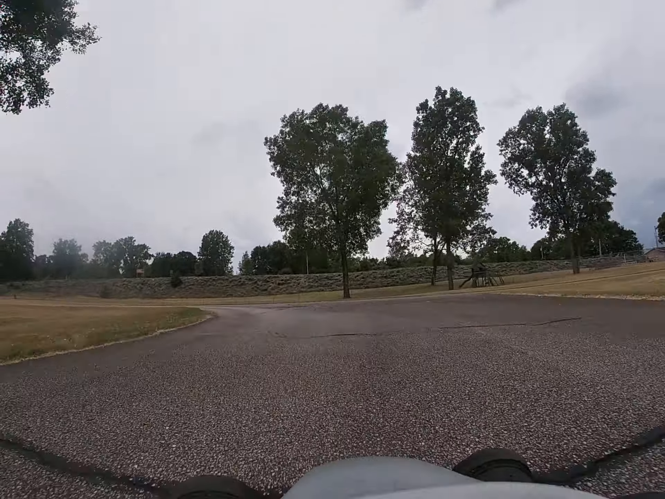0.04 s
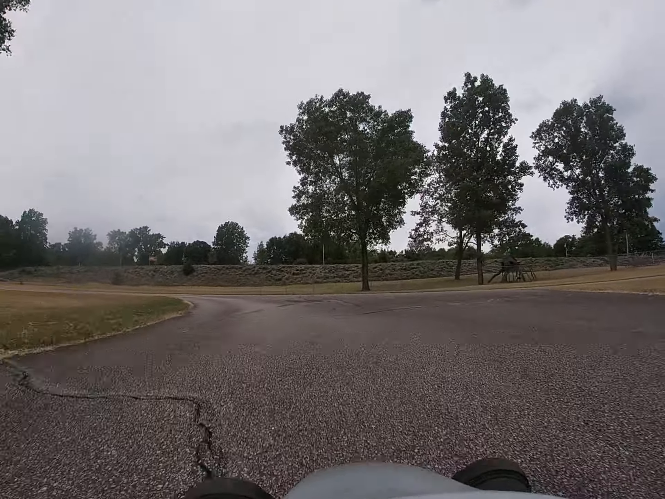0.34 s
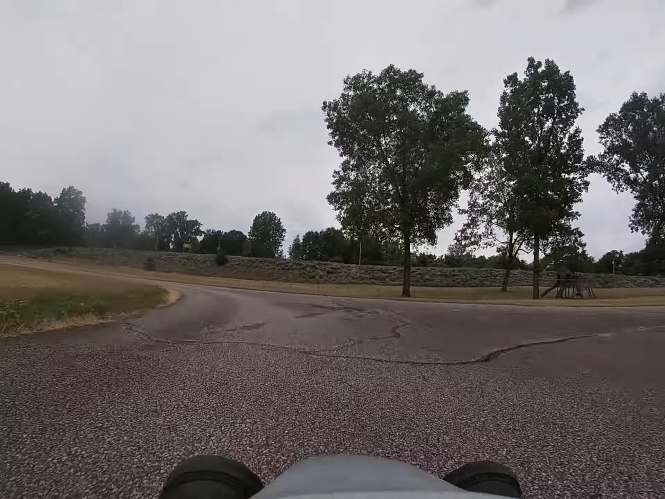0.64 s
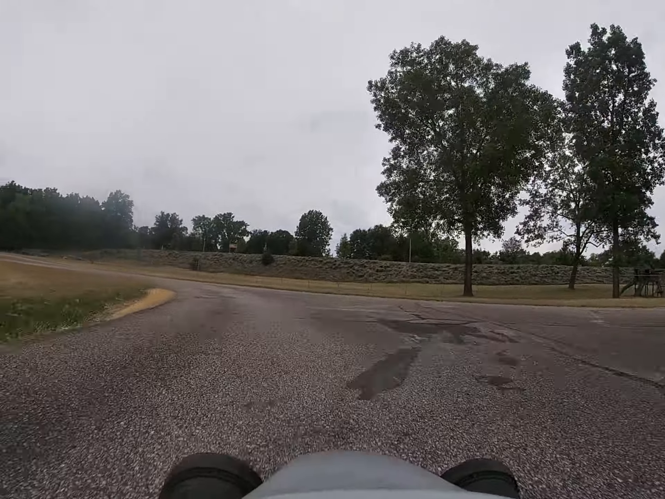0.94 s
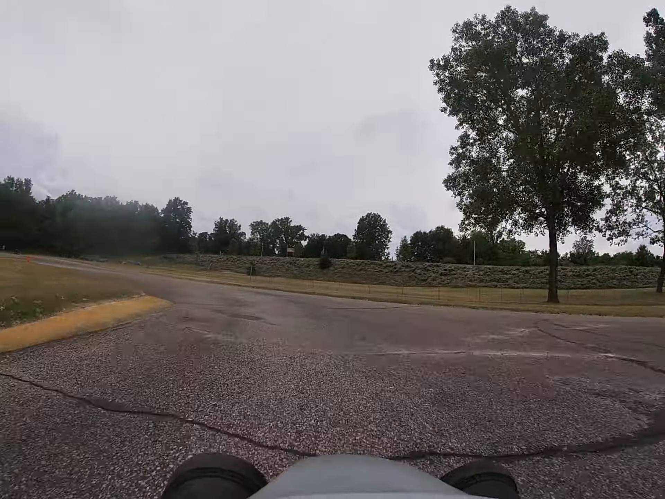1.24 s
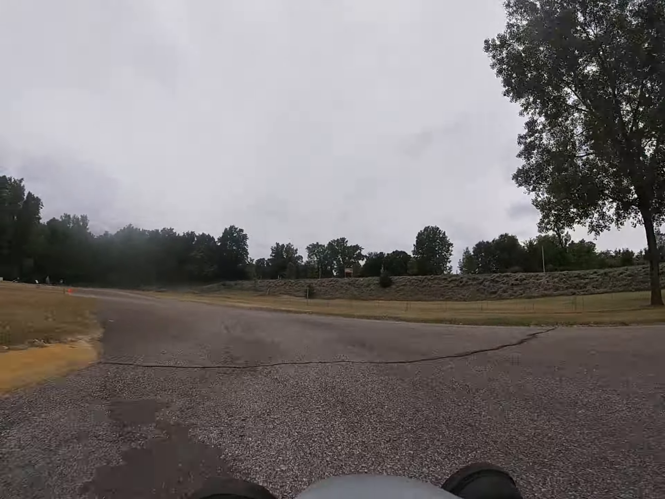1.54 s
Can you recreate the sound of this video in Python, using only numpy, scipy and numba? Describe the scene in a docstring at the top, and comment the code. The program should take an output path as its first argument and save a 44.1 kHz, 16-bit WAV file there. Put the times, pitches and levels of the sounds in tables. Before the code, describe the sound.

A single-cylinder go-kart engine thumps rapidly, heard from on board on an outdoor asphalt track. Tyres roar beneath it, loose metal clatters and buzzes, and wind buffets the microphone. Bits of grit tick against the bodywork in the first half. The engine dips briefly at the start, climbs slightly in pitch, then softens and dulls near the end as the tyres scrub harder through a corner.

```python
"""The rapid thumping of a single-cylinder four-stroke go-kart, heard on board as it laps worn asphalt.
Each firing is a pressure impulse that rings the exhaust pipe and muffler; in the same cycle the airbox
gulps, the valve gear clatters and a metal guard buzzes. Beneath the engine the tyres roar and scrub
through a corner, the chain sizzles, grit ticks on the bodywork and wind buffets the microphone."""
import sys
import numpy as np
from scipy import signal
from scipy.fft import rfft, irfft
from scipy.io import wavfile
from numba import njit

SR = 44100
rng = np.random.default_rng(int(sys.argv[2]) if len(sys.argv) > 2 else 0)


def transcribe(signal):
    """Save signal, clipped to [-1, 1], as a 16-bit WAV file at the path in sys.argv[1]."""
    frames = np.atleast_2d(signal).T
    limited = np.clip(frames, -1, 1)
    pcm = np.round(limited * 32767).astype(np.int16)
    wavfile.write(sys.argv[1], SR, pcm)


N = 255329
TIME = np.arange(N) / SR
FREQ = np.maximum(np.arange(N + 1) * SR / (2 * N), 1)


def undb(db):
    """Amplitude ratio of a level in decibels."""
    return 10 ** (np.asarray(db) / 20)


def unit(x):
    """Normalisation to an rms of one."""
    return x / np.sqrt(np.mean(x ** 2))


def curves(table):
    """Linear interpolation of each column in time."""
    times, *columns = np.transpose(table)
    return [np.interp(TIME, times, column) for column in columns]


def swells(table):
    """Sum of raised cosines, one for each (middle, length, height) row."""
    return sum(height * np.cos(np.pi * np.clip((TIME - middle) / length, -.5, .5)) ** 2
               for middle, length, height in table)


def through(x, response):
    """Linear filtering: the spectrum times a frequency response."""
    return irfft(rfft(x, 2 * N) * response)[:N]


def resonance(hz, width_hz):
    """Response of one damped mode."""
    return 1 / (1 + 1j * (FREQ / hz - hz / FREQ) * hz / width_hz)


def below(hz, order):
    """Zero-phase low-pass response."""
    return 1 / (1 + (FREQ / hz) ** order)


def colour(points):
    """Spectral envelope through (f/Hz, level/dB) points, rolling off beyond both ends."""
    hz, db = np.transpose(points)
    octaves_under = np.maximum(np.log2(hz[0] / FREQ), 0)
    octaves_over = np.maximum(np.log2(FREQ / hz[-1]), 0)
    return undb(np.interp(np.log(FREQ), np.log(hz), db) - 13 * octaves_under - 24 * octaves_over)


def noise(response):
    """Filtered Gaussian noise of unit rms."""
    return unit(through(rng.standard_normal(N), response))


def walk(rate_hz):
    """Smooth random fluctuation of unit rms."""
    return noise(below(rate_hz, order=4))


@njit
def sweep(x, hz, width_hz):
    """State-variable band-pass with a moving centre frequency."""
    y, band_state, low_state = np.empty(len(x)), 0., 0.
    for i in range(len(x)):
        gain, damping = np.tan(np.pi * hz[i] / SR), width_hz / hz[i]
        band = (band_state + gain * (x[i] - low_state)) / (1 + gain * (gain + damping))
        band_state = 2 * band - band_state
        low_state += 2 * gain * band
        y[i] = damping * band
    return y


# Spectrum of the buffeting: f/Hz, relative level/dB
WIND_SPECTRUM = [(10, -11.5), (25, -1.5), (50, -3.5), (75, -6.5), (110, -7), (200, 0), (400, -24.5)]
# Gusts: middle t/s, duration/s, rise/dB
GUSTS = [(.03, .35, 3.5), (.62, 1.45, 5), (4.15, .4, 4), (4.7, 0.27, 3.5), (5.22, 0.96, 4)]
def wind(level_db=-22):
    """Turbulence: eddies at the microphone make slow pressure fluctuations, stronger in gusts."""
    return noise(colour(WIND_SPECTRUM)) * undb(level_db + swells(GUSTS) + 0.98 * walk(28))


# Spectrum of the rushing air: f/Hz, relative level/dB
AIR_SPECTRUM = [(1500, -3.5), (2700, 3), (3300, -3), (4400, -4), (5200, -3.5), (5900, -2), (6400, -6.5),
                (7300, -18.5), (9000, -23.5), (14000, -47.5)]
def rushing_air(speed_octaves, rise_db, level_db=-46, db_per_octave=2):
    """Flow noise: a hiss whose amplitude follows a power law of speed."""
    db = level_db + db_per_octave * speed_octaves + rise_db
    return noise(colour(AIR_SPECTRUM)) * undb(db + 1.1 * walk(200))


# Spectrum of the chain: f/Hz, relative level/dB
CHAIN_SPECTRUM = [(5000, -15), (7500, -4), (9500, 2.5), (11000, 1), (12000, -7), (13500, -12)]
# Bursts of sizzling: middle t/s, duration/s, rise/dB
SIZZLES = [(2.37, .3, 4), (4.0, 0.13, 5), (4.38, .2, 5), (4.6, .14, 7), (4.76, .14, 3), (5.2, .1, 3)]
def chain(speed_octaves, rise_db, level_db=-65.5, db_per_octave=14.5):
    """Mechanical noise: the chain's high sizzle grows steeply with speed."""
    db = level_db + db_per_octave * speed_octaves + rise_db + swells(SIZZLES)
    return noise(colour(CHAIN_SPECTRUM)) * undb(db + 2.2 * walk(300))


# Spectra of the tyres' roar and scrub: f/Hz, relative level/dB
ROAR_SPECTRUM = [(150, -1), (340, 4.5), (430, 4), (520, 2), (660, 0), (740, -3.5), (950, -5.5), (1400, -19),
                 (3000, -27)]
SCRUB_SPECTRUM = [(600, -19), (1000, -6), (1300, 1), (1480, 0), (1640, 1.5), (1800, -4), (2050, -6),
                  (2700, -13.5), (3500, -21), (7000, -54)]
def tyres(speed_octaves, rise_db, bumps, roar_db=-28, scrub_db=-38, db_per_octave=7):
    """Rolling contact and friction: tyres on asphalt give a low roar and a higher scrub."""
    drive_db = db_per_octave * speed_octaves + rise_db
    roar = noise(colour(ROAR_SPECTRUM)) * undb(roar_db + drive_db + 1.8 * bumps)
    scrub = noise(colour(SCRUB_SPECTRUM)) * undb(scrub_db + drive_db + 0.92 * bumps + 2 * walk(130))
    return roar + scrub


# Rough asphalt, and the tyres' bite in a hard corner: middle t/s, duration/s, rise/dB
ROUGH_PATCHES = [(.28, 0.52, 2), (.65, 0.68, 3.5), (1.08, 0.61, 2), (1.68, .25, 2.5), (2.23, 0.49, 0.5),
                 (2.87, 0.32, 3), (4.05, 0.9, 0.5)]
CORNERS = [(5.45, 1.86, 4)]
def rolling(speed_octaves):
    """Common modulation: speed, roughness, cornering and bumps move tyres, air and chain together."""
    bumps, rough_db, corner_db = walk(22), swells(ROUGH_PATCHES), swells(CORNERS)
    return (tyres(speed_octaves, rough_db + corner_db, bumps)
            + rushing_air(speed_octaves, rough_db + 0.71 * corner_db + 1.3 * bumps)
            + chain(speed_octaves, 0.7 * rough_db + 0.71 * corner_db + 1.4 * bumps))


# Stone strikes: t/s, level/dB, decay time T60/s
STONE_STRIKES = [(0.23, -26, .012), (0.396, -30, 0.055), (0.544, -23.5, 0.012), (0.551, -38, .12),
                 (0.575, -34, 0.043), (0.6523, -30, .06), (0.818, -32.5, 0.029), (1.0257, -28.5, 0.029),
                 (1.517, -35, 0.03), (1.645, -38, 0.08), (1.685, -34, .05), (1.7674, -32.5, 0.029),
                 (1.968, -33, 0.013), (2.536, -27, .012), (2.724, -32, 0.012)]
# Spectrum of a strike: f/Hz, relative level/dB
STONE_SPECTRUM = [(1000, -10.5), (3000, 7), (4500, 1.5), (6300, 3.5), (7500, -19), (11000, -21),
                  (14000, -38)]
def grit():
    """Impact noise: stones flung from the tyres hit the bodywork, each tick decaying exponentially."""
    envelope = np.zeros(N)
    for t, db, t60 in STONE_STRIKES:
        start = int(t * SR)
        envelope[start:] += undb(db) * np.exp(-np.log(1000) * TIME[:N - start] / t60)
    return envelope * noise(colour(STONE_SPECTRUM))


def frame_hum(cycle, firing_hz, mode_hz=53.7, width_hz=4.7, resonant_db=-30.5):
    """Forced vibration: the crank, turning twice per firing, drives the frame through a resonance."""
    detuning = (2 * firing_hz - mode_hz) / (width_hz / 2)
    drive = np.sqrt(2) * np.sin(4 * np.pi * cycle)
    return drive * undb(resonant_db + 1.1 * walk(8.2)) / np.hypot(1, detuning)


def stroke(cycle, centre, sharpness):
    """Periodic envelope: one swell per engine cycle, peaking at the fraction `centre`."""
    return unit(np.exp(sharpness * np.cos(2 * np.pi * (cycle - centre))))


# Shaking common to all the loose metal: t/s, level/dB
SHAKING = [(0, -55), (1, -50.5), (2.4, -45.5), (3.75, -44.5), (4.6, -53), (5.79, -59)]
# Spectrum of the valve clatter: f/Hz, relative level/dB
VALVE_SPECTRUM = [(700, -17), (1500, 0), (2600, 11), (3500, 2.5), (4800, 3), (5700, -10.5), (6400, -8),
                  (7400, -19), (11000, -22), (14000, -28.5)]
# Bouts in which the guard buzzes harder: middle t/s, duration/s, rise/dB
GUARD_BOUTS = [(.1, 1, 9.5), (1.38, 1, 4), (2.42, 0.64, 4), (3.7, 0.48, 7)]
def shaken_metal(cycle, tinkle_db=-5, clank_db=-1, guard_db=0.5):
    """Periodic excitation: valve gear clatters, plates tinkle and clank, and the guard buzzes."""
    shake_db, = curves(SHAKING)
    loose = cycle + .015 * walk(12)  # loose parts strike a little early or late
    clatter = noise(colour(VALVE_SPECTRUM)) * stroke(loose, .16, 1.5) * undb(2.2 * walk(150))
    tinkle = noise(resonance(5690, 760) ** 2) * stroke(loose, .21, 2.3) * undb(walk(200))
    clank = noise(resonance(1600, 200) ** 2) * stroke(loose, .15, 4.5) * undb(2 * walk(40))
    buzz = noise(resonance(2202, 125) ** 2) * stroke(loose, .085, .65) * undb(2.1 * walk(250))
    side_load_db = 2.5 * swells(CORNERS)  # cornering makes the plates clank harder
    plates = undb(tinkle_db) * tinkle + undb(clank_db + side_load_db) * clank
    guard = undb(guard_db + swells(GUARD_BOUTS)) * buzz
    return undb(shake_db) * (clatter + plates + guard)


# Hollow note of the airbox: t/s, centre f/Hz, level/dB
AIRBOX_NOTE = [(0, 565, -43), (.7, 575, -27.5), (2.7, 594, -29.5), (3.15, 549, -26), (4.25, 556, -30),
               (4.8, 585, -27.5), (5.28, 460, -24), (5.55, 503, -35.5), (5.79, 534, -38)]
def intake(pulses, gulp_db=-4, width_hz=150.):
    """Cavity resonance: airflow and a gulp per cycle sound the airbox, whose note drifts and dips."""
    hz, db = curves(AIRBOX_NOTE)
    air = rng.standard_normal(N) + undb(gulp_db) * unit(pulses)
    return undb(db) * unit(sweep(sweep(air, hz, width_hz), hz, width_hz))


# The driver eases off the throttle: middle t/s, duration/s, fraction closed
THROTTLE_LIFTS = [(.4, 0.85, 0.3), (1.6, .25, 0), (5.11, 1, 0.92)]
# Weak firings as the throttle moves: t/s, change of level/dB
STUMBLES = [(1.605, -8.5), (1.647, -1), (4.83, -2), (5.14, -2.5)]
def firings(cycle, valve_phase=.05, jitter_s=.00011, scatter_db=0.33, coasting_scatter_db=2.3):
    """Impulse train: the exhaust valve frees one slug of gas a cycle, uneven off the throttle."""
    times = np.interp(np.arange(int(cycle[-1]) + 1) + valve_phase, cycle, TIME)
    lateness, strength = rng.standard_normal((len(times), 2)).T
    closed = np.interp(times, TIME, swells(THROTTLE_LIFTS))
    size_db = (scatter_db + coasting_scatter_db * closed ** 2) * strength
    for t, db in STUMBLES:
        size_db[np.argmin(abs(times - t))] += db
    onsets = np.clip((times + jitter_s * lateness) * SR, 0, N - 1).astype(int)
    pulses = np.zeros(N)
    pulses[onsets] = undb(size_db)
    return pulses


# Modes of the exhaust pipe: f/Hz, bandwidth/Hz, relative level/dB, polarity
PIPE_MODES = [(159.6, 42, 2.5, -1), (187.3, 70, -1.5, 1), (242.2, 18.6, -10, -1)]
def exhaust_response(muffler_hz=304, width_hz=60, cutoff_hz=350, echo_s=0.00653, echo=0.2):
    """Acoustic filters in series: pipe modes, a resonant low-pass muffler and the open tailpipe."""
    pipe = sum(sign * undb(db) * resonance(hz, width) for hz, width, db, sign in PIPE_MODES)
    muffler = resonance(muffler_hz, width_hz) * muffler_hz / (1j * FREQ) * below(cutoff_hz, order=14)
    open_end = 1 - echo * np.exp(-2j * np.pi * FREQ * echo_s)  # the reflected wave is inverted
    radiation = 1 - below(102.3, order=10)  # a narrow outlet radiates little deep bass
    return pipe * muffler * open_end * radiation


def exhaust(pulses, boom_db=-15.5, upper_db=-17.5, flow_db=-29):
    """Impulse excitation: firings ring the exhaust over a steady gas flow, duller off the throttle."""
    closed = swells(THROTTLE_LIFTS)
    outlet = exhaust_response()
    low_share = below(225, order=16)
    boom = unit(through(pulses, outlet * low_share)) * undb(boom_db - 4 * closed)
    upper = unit(through(pulses, outlet * (1 - low_share)))
    # under load the slugs are steeper and drive the upper modes harder
    upper *= undb(upper_db - 14 * closed + 1.2 * walk(24))
    return boom + upper + undb(flow_db) * noise(outlet)


def engine(firing_hz):
    """Phase locking: one crank times the exhaust, intake, shaken metal and frame."""
    cycle = np.cumsum(firing_hz) / SR
    pulses = firings(cycle)
    return exhaust(pulses) + intake(pulses) + shaken_metal(cycle) + frame_hum(cycle, firing_hz)


# Firing rate of the engine: t/s, f/Hz
FIRING_RATE = [(0.0, 23.79), (0.4, 23.86), (0.8, 23.69), (1.2, 23.99), (1.45, 23.61), (1.62, 23.65),
               (1.75, 25.16), (1.9, 26.21), (2.2, 26.42), (3.5, 28.17), (4.4, 29.17), (4.66, 28.68),
               (4.9, 29.32), (5.15, 28.22), (5.4, 27.99), (5.79, 27.45)]
def scene(cruise_hz=26.5):
    """Superposition: engine, rolling noise, grit and wind add at one point on the kart."""
    firing_hz, = curves(FIRING_RATE)
    speed_octaves = np.log2(firing_hz / cruise_hz)  # zero at cruising speed
    return (engine(firing_hz) + rolling(speed_octaves) + grit() + wind())[None]


def record(dry, ceiling=0.77, top_hz=13800):
    """Soft saturation rounds the highest peaks; a steep low-pass limits the bandwidth."""
    rounded = dry / (1 + (dry / ceiling) ** 8) ** (1 / 8)
    return signal.sosfilt(signal.ellip(8, .2, 70, top_hz, fs=SR, output="sos"), rounded)


dry = scene()
out = record(dry)
transcribe(out)
```